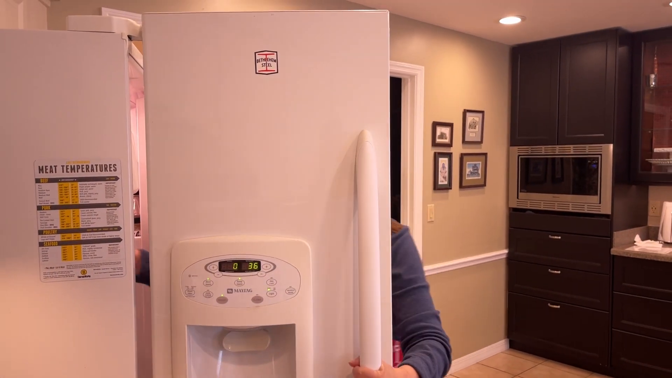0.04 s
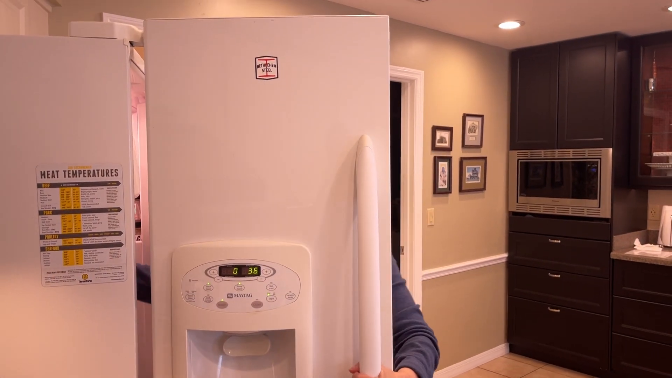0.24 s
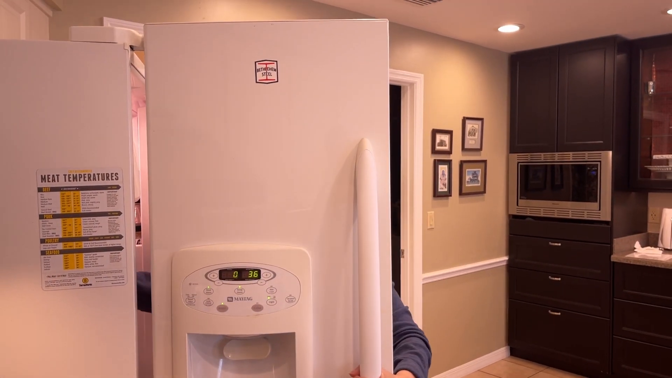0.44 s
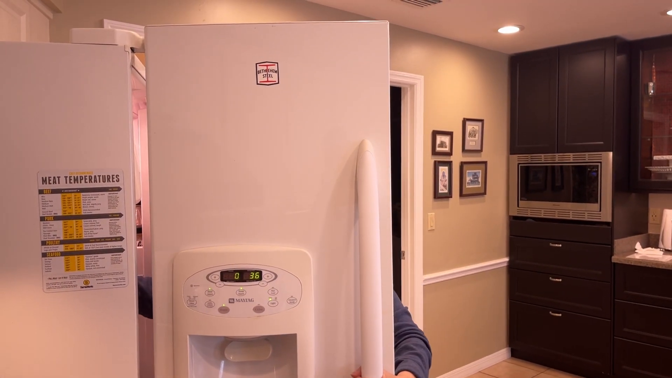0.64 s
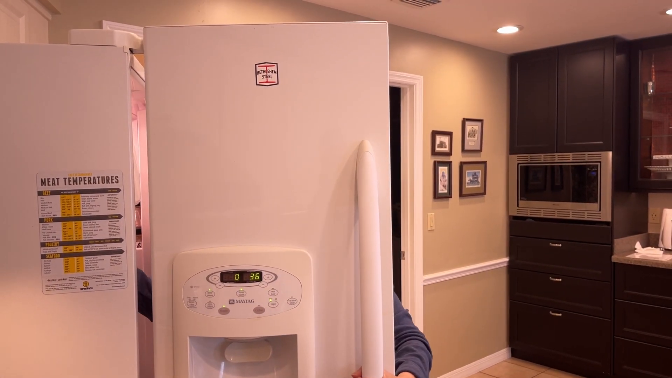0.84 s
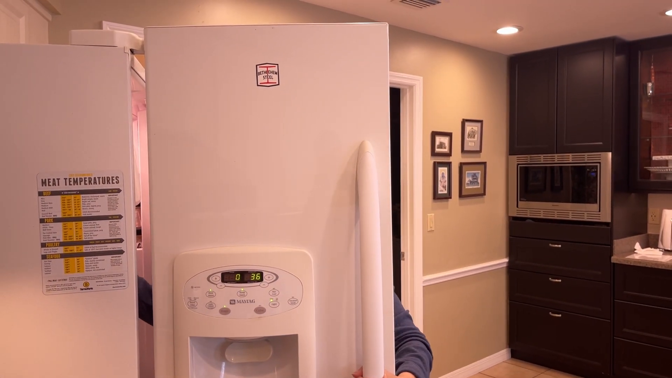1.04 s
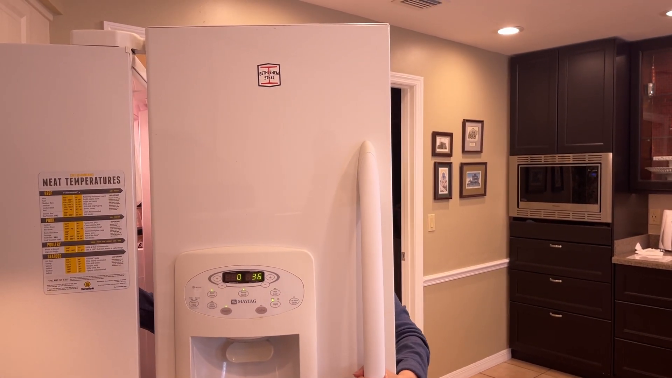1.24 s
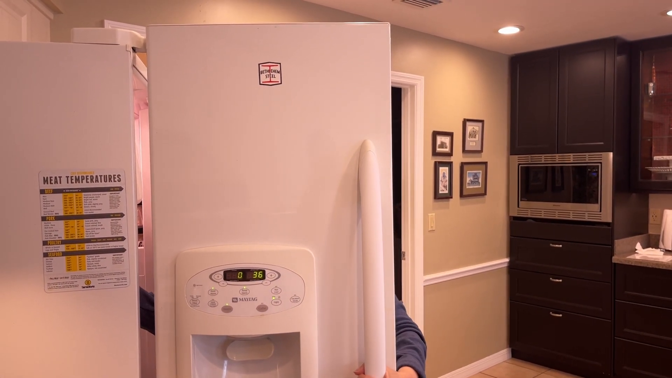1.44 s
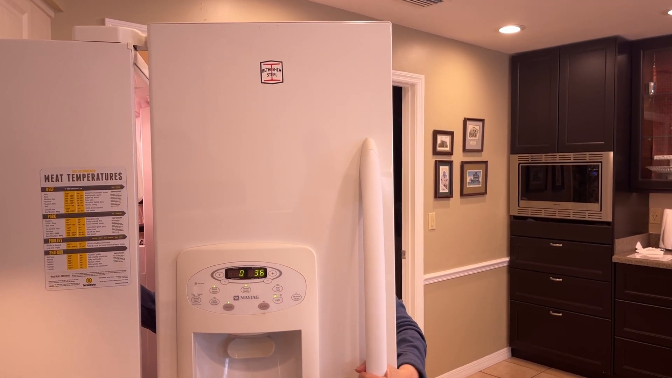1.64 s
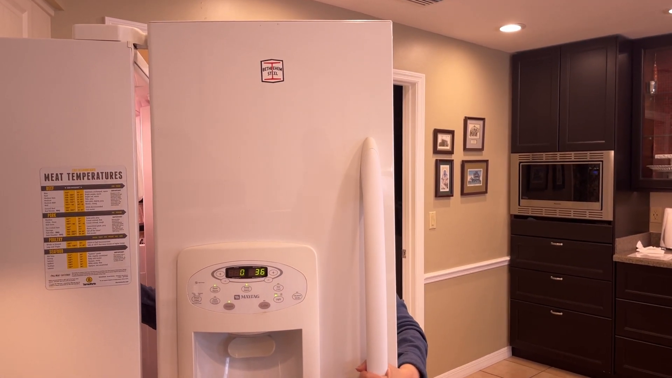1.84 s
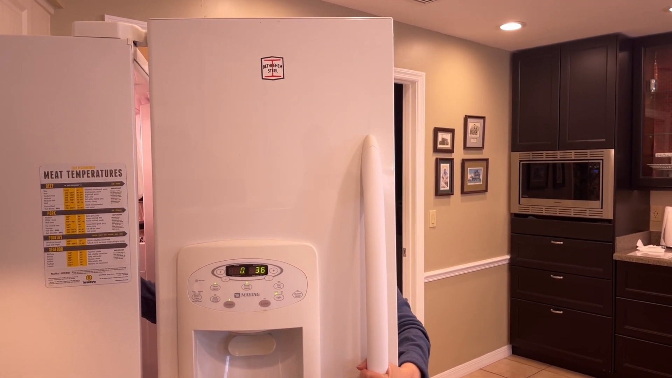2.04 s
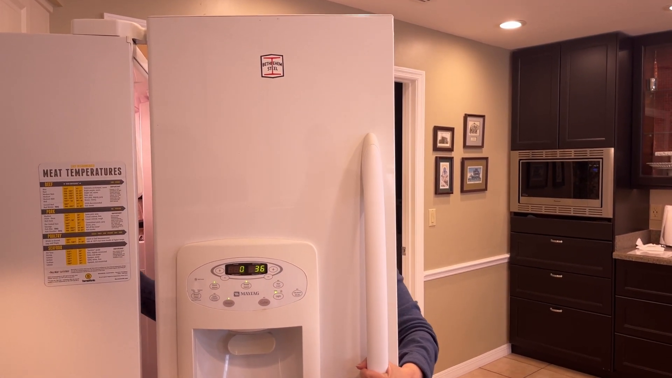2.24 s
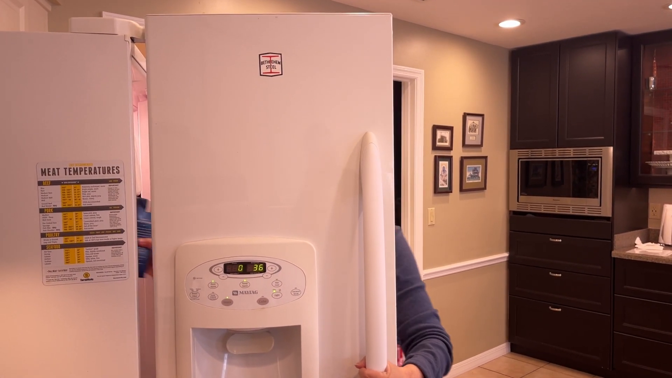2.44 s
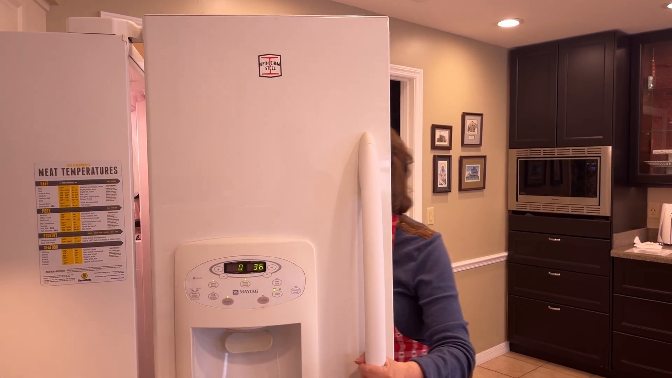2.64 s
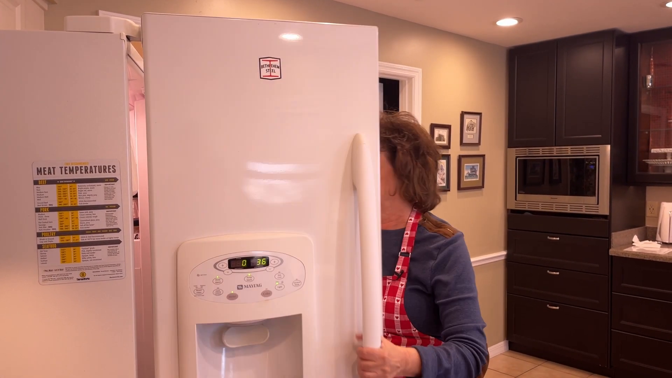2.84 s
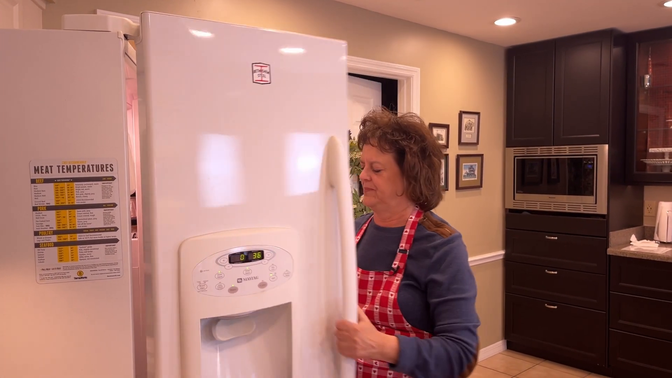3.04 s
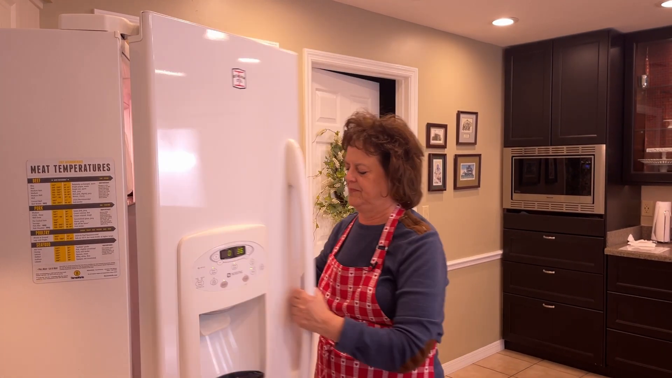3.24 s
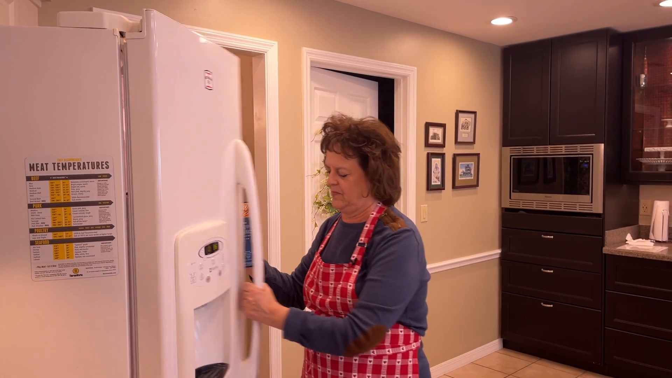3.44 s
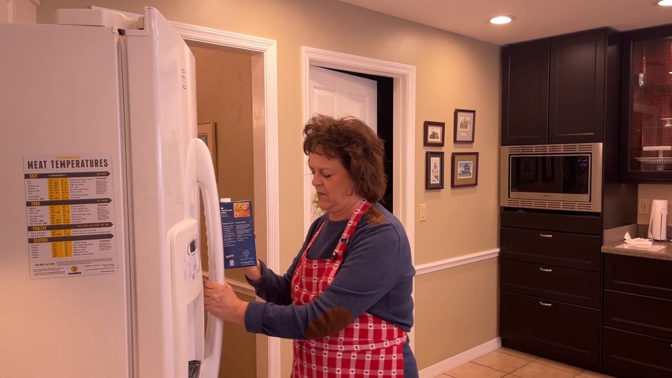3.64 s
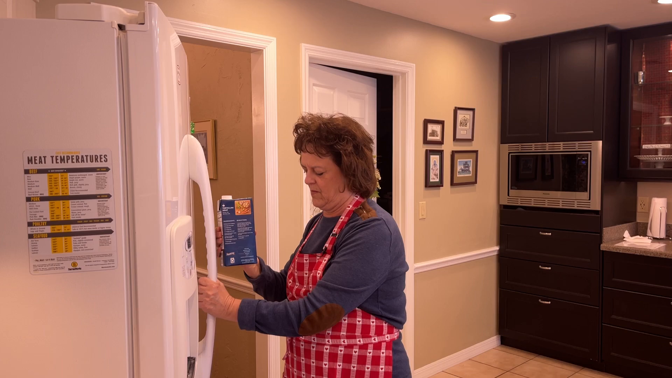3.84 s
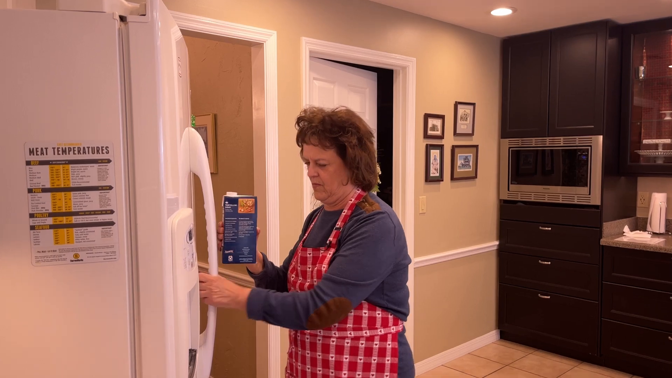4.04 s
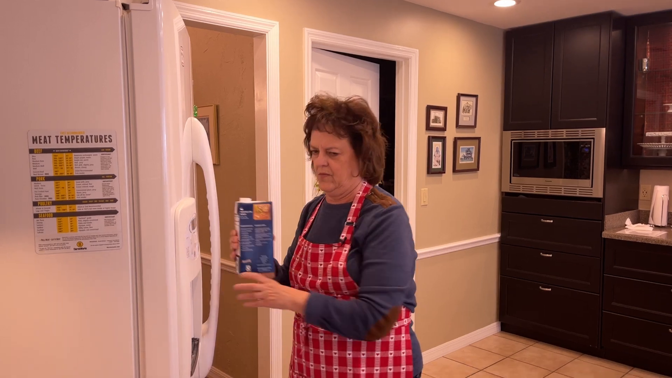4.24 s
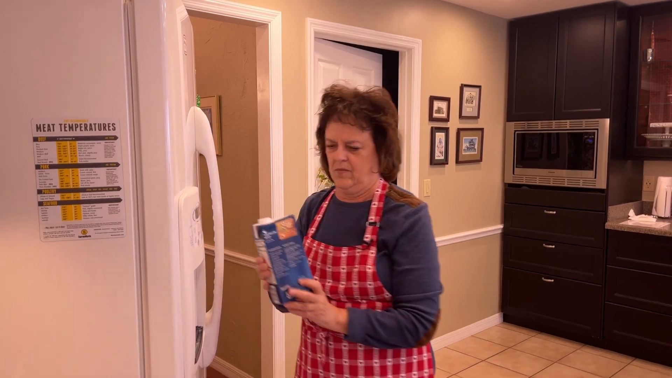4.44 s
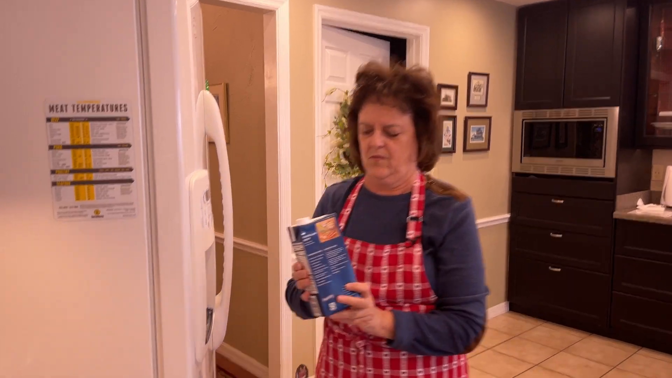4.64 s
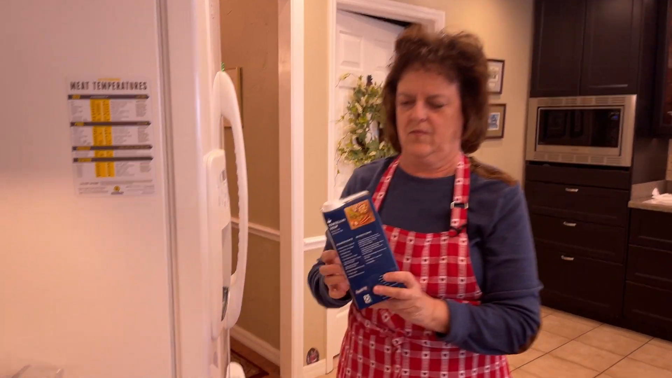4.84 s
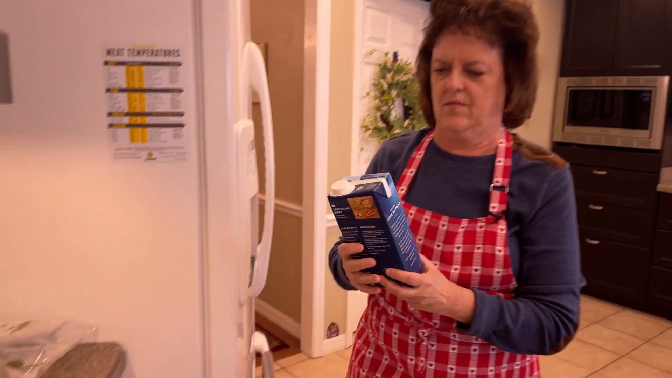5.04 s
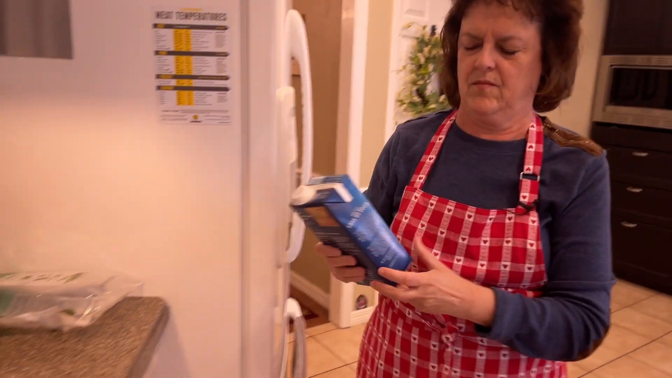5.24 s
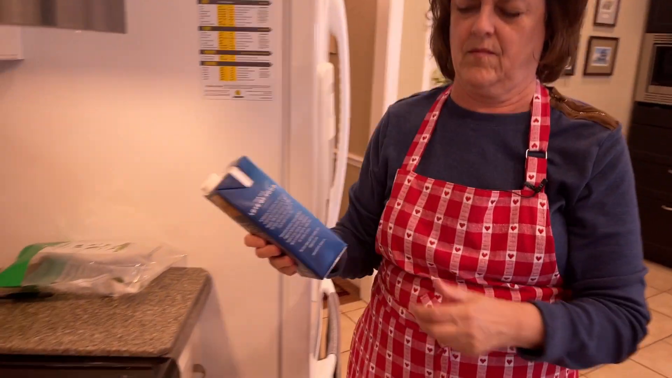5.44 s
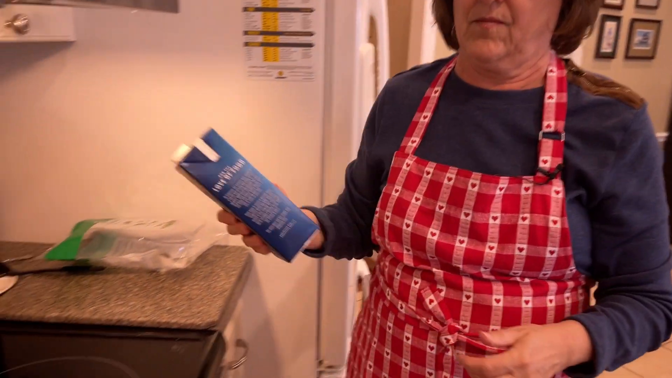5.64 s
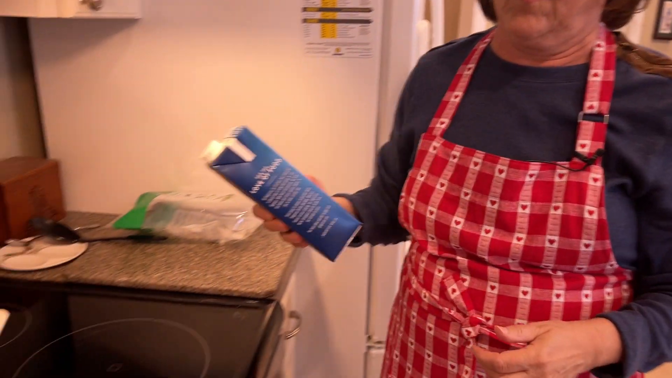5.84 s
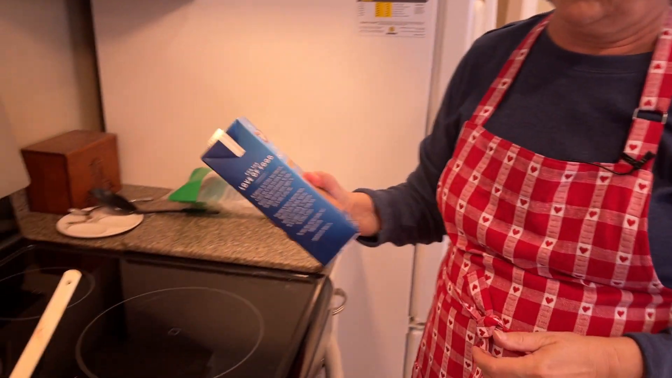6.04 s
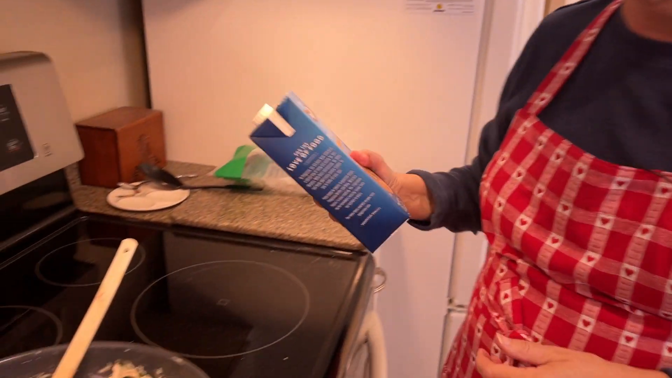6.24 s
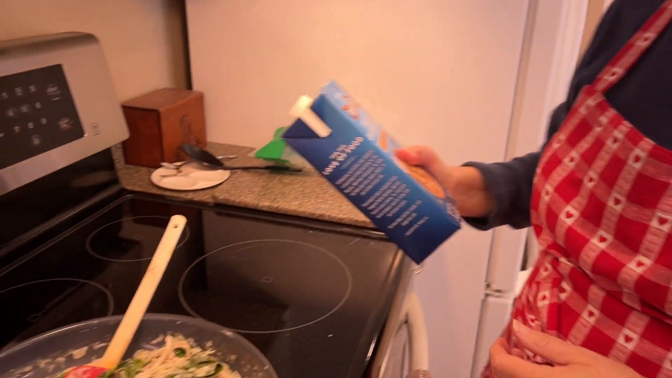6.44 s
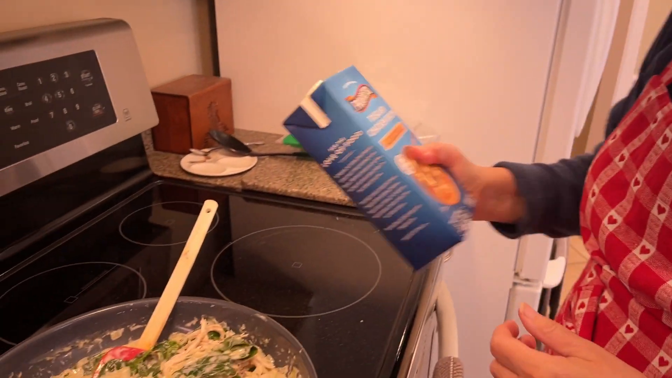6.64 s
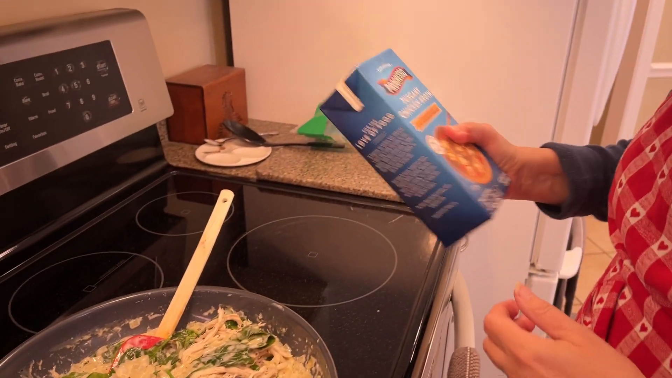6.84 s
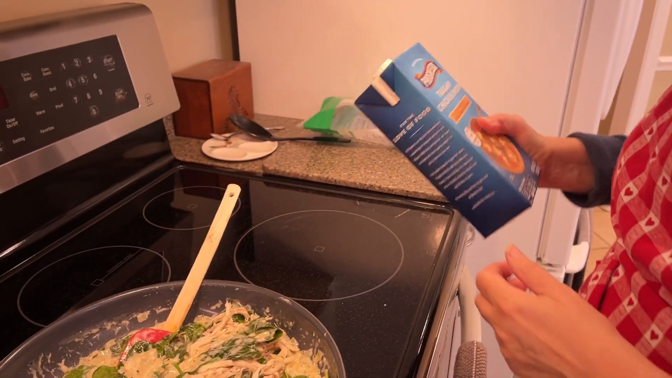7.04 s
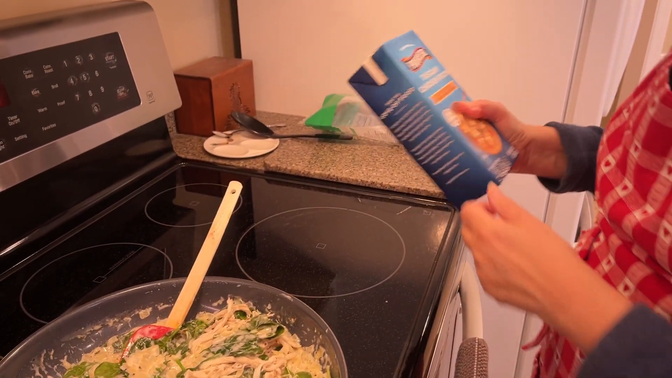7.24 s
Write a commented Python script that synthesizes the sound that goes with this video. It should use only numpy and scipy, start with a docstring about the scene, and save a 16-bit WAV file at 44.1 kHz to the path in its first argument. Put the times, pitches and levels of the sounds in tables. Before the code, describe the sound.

A quiet home kitchen, heard through a microphone worn on clothing, with steady faint hiss and a low refrigerator hum. From about 0.4 to 1.5 seconds, cloth rustles close by while things slide and knock lightly on a fridge shelf, with the clearest taps near 0.7 and 1.0 to 1.4. It then stays nearly quiet, with small fabric ticks around 1.8 to 2.2. Near 3.0 a very thin hinge squeak and soft foot thuds lead to the door shutting at 3.6: a rapid cluster of hard blows and rattling contents, dulling and dying by about 4.0 with a short room tail. From 4.3 to 5.4, sleeve rustle and light carton taps. From 5.5 to the end at about 7.3, the half-full carton is shaken briskly, with uneven splashes, bubbling gurgles and hollow slaps, strongest near 6.06 and 7.1.

```python
"""A home kitchen, heard from a microphone worn on clothing. First, over faint hum and hiss, cloth rustles close by
and things slide and knock on a fridge shelf: noise bursts, and struck bodies ringing in damped modes. The door
shuts with a thin squeak, a burst of rattling blows and a roar that dulls as it dies; feet, door and handled carton
thud as single low swings. Then the half-full carton is shaken: bursts of noise and rising bubble tones slosh,
slaps ring its walls."""
import sys
import numpy as np
from scipy import signal
from scipy.fft import rfft, irfft
from scipy.io import wavfile
from scipy.ndimage import uniform_filter1d

SR = 44100
rng = np.random.default_rng(int(sys.argv[2]) if len(sys.argv) > 2 else 0)


def log_audio(samples):
    """Write samples as a 16-bit WAV file to the path given in sys.argv[1]."""
    # one column per channel
    frames = np.atleast_2d(samples).T
    # limit to full scale, then quantise
    limited = np.clip(frames, -1, 1)
    pcm = np.round(limited * 32767).astype(np.int16)
    wavfile.write(sys.argv[1], SR, pcm)


N = 321930  # length [samples]


def undb(db):
    """Decibels to amplitude."""
    return 10 ** (np.asarray(db) / 20)


def unit(x):
    """Scale to rms 1."""
    return x / np.sqrt(np.mean(x ** 2))


def white():
    """White noise as long as the scene."""
    return rng.standard_normal(N)


def band(x, lo_hz, hi_hz):
    """Band-pass."""
    sos = signal.butter(2, [lo_hz, min(hi_hz, .45 * SR)], "band", fs=SR, output="sos")
    return signal.sosfilt(sos, x)


def colour(x, points):
    """Shape the spectrum of noise by (frequency [Hz], level [dB]) points, joined along log frequency."""
    hz, db = np.transpose(points)
    f = np.arange(len(x) // 2 + 1) * SR / len(x) + 1  # + 1 avoids log 0
    return irfft(rfft(x) * undb(np.interp(np.log(f), np.log(hz), db)), len(x))


def walk(rate):
    """Random levels, `rate` of them a second, with slewed steps; rms 1."""
    k = int(SR / rate)
    held = np.repeat(rng.standard_normal(N // k + 1), k)
    return unit(uniform_filter1d(held, k)[:N])


def grains(rate, scatter_db, tail_s):
    """Envelope of dense random bursts of uneven size, each with a sharp front and decaying tail; rms 1."""
    sizes = undb(scatter_db * np.clip(rng.standard_normal(N), -2, 2))
    clicks = (rng.random(N) < rate / SR) * sizes
    power = signal.lfilter([1], [1, -np.exp(-1 / (tail_s * SR))], clicks ** 2)
    return unit(np.sqrt(power + 1e-9))


def tilted(bursts, tilt, bands, pivot_hz, flicker_db):
    """Bursts in octave bands of unrelated noise, weighted by a slope [dB/octave], each flickering alone."""
    out = 0
    for hz, db in bands:
        noise = unit(band(bursts * white(), hz / np.sqrt(2), hz * np.sqrt(2)))
        level_db = db + tilt * np.log2(hz / pivot_hz) + flicker_db * walk(30)
        out = out + undb(level_db) * noise
    return out


def strokes(rows):
    """Gain of overlapping gestures that swell and fade by 20 dB in their times, and their power-weighted tilt."""
    t, power, tilt = np.arange(N) / SR, np.full(N, 1e-20), np.zeros(N)
    for s, db, swell_s, fade_s, *slope in rows:
        swell_s, fade_s = max(swell_s, .003), max(fade_s, .003)
        near = slice(max(int((s - 3 * swell_s) * SR), 0), int((s + 3 * fade_s) * SR))
        shape_db = 20 * np.minimum((t[near] - s) / swell_s, (s - t[near]) / fade_s)
        own = undb(db + shape_db) ** 2
        power[near] += own
        tilt[near] += own * sum(slope)  # rows without a slope add none
    return np.sqrt(power), tilt / power


def knocks(events, modes, reach_oct, rise_s, crack_s, crack_hz, floor_hz):
    """Each blow rings the modes nearest to where it lands and throws a short crack of treble."""
    out, t = np.zeros(N + SR), np.arange(SR // 4) / SR
    hz, db = np.transpose(modes)[:, :, None]
    chance = rng.standard_normal((len(events), len(modes), 2))
    hiss = unit(band(rng.standard_normal(N + SR), crack_hz, 9000.0))
    low_cut = signal.butter(4, floor_hz, "high", fs=SR, output="sos")  # a small body radiates no bass
    for (s, peak_db, near_hz, t60, crack_db), luck in zip(events, chance):
        distance = np.log2(hz / near_hz) / reach_oct
        share = undb(db + 4.1 * luck[:, :1]) / (1 + distance ** 2) ** 2
        # higher modes die sooner
        fade = np.exp(-np.log(1000) * t / max(t60, .01) * (hz / near_hz) ** 0.075)
        swing = np.sin(2 * np.pi * hz * (1 + 0.052 * luck[:, 1:]) * t)
        ring = (share * fade * swing).sum(0) * (1 - np.exp(-t / rise_s))
        ring = signal.sosfilt(low_cut, ring)
        i = int(s * SR)
        crack = undb(crack_db) * hiss[i:i + len(t)] * np.exp(-t / crack_s)
        out[i:i + len(t)] += undb(peak_db) * (ring / np.abs(ring).max() + crack)
    return out[:N]


# blows of the closing door and its load:
# (time [s], peak of the direct ring [dB], struck near [Hz], t60 there [s], crack rms at onset re that peak [dB])
DOOR_BLOWS = [(3.577, -55, 510, 0.064, -11), (3.619, -24, 810, 0.016, -11.5), (3.627, -27, 980, 0.037, -34),
              (3.639, -35, 1360, 0.017, -8.5), (3.649, -25.5, 690, 0.02, -37),
              (3.673, -23.5, 406, 0.068, -19), (3.68, -17, 636, 0.008, -31),
              (3.699, -30.5, 368, 0.059, -37), (3.7335, -28.5, 1500, 0.02, -16),
              (3.756, -22.5, 674, 0.0166, -17), (3.786, -23.5, 610, 0.035, -17)]
# modes of the door: (frequency [Hz], relative level [dB])
DOOR_MODES = [(250, 6), (365, 3), (520, -24), (600, 4.5), (790, 4.5), (1090, -0.5), (1295, 7), (1850, 13.5),
              (2290, 7)]


def door_blows():
    """The door and its load ring in damped modes, with very short bright cracks."""
    return knocks(DOOR_BLOWS, DOOR_MODES, 0.85, 0.00058, 0.0025, 2800.0, 156.0)


SEAL_TOUCHES_S, LANDS_S, SHUDDER_HOLD_S = 3.577, 3.621, 0.22
SEAL_DB, SHUDDER_DB = -64, -41  # gain from the seal's touch, and at the landing
HOLD_SAG_DB_S, DYING_DB_S = 20, 117  # fall per second, during and after the hold
SHUDDER_TILT_DB_OCT, DULLING_DB_OCT_S, DULLEST_DB_OCT = 3, 16, -2
# octave bands of the rattling parts: (centre [Hz], relative level [dB])
SHUDDER_BANDS = [(55, -52), (110, -13.5), (220, -8), (440, -3.5), (880, -5.5), (1760, -16.5), (3520, -23.5),
                 (7040, -27.5)]


def shudder():
    """Many loose parts rattling at once: a rough roar that sags slowly, then dies away, dulling early on."""
    since = np.arange(N) / SR - LANDS_S
    sag_db = HOLD_SAG_DB_S * np.clip(since, 0, SHUDDER_HOLD_S)
    dying_db = DYING_DB_S * np.maximum(since - SHUDDER_HOLD_S, 0)
    seal = undb(SEAL_DB) * (since > SEAL_TOUCHES_S - LANDS_S)
    gain = np.where(since > 0, undb(SHUDDER_DB - sag_db - dying_db), seal)
    tilt = np.maximum(SHUDDER_TILT_DB_OCT - DULLING_DB_OCT_S * np.maximum(since, 0), DULLEST_DB_OCT)
    return gain * tilted(grains(370, 1.5, 0.0022), tilt, SHUDDER_BANDS, 320, 1)


# jerks of the carton, each loudest 6 ms after its time:
# (time [s], gain of the splash [dB], gain of the sleeve's rustle [dB], fade by 20 dB [s])
SHAKES = [(5.456, -52, -59, 0.11), (5.5254, -47, -52.5, 0.1), (5.605, -50.5, -67, 0.07),
          (5.629, -47, -59, 0.096), (5.6595, -45, -59, 0.3), (5.742, -38, -53, 0.044),
          (5.764, -41, -54, 0.11), (5.7874, -47, -49.5, 0.1), (5.827, -44, -56, 0.082),
          (5.8726, -49, -74, 0.068), (5.911, -42, -54, 0.077), (5.9333, -37, -63, 0.078),
          (5.9623, -38, -56, 0.092), (6.01, -40.5, -49, 0.097), (6.073, -45, -56, 0.11),
          (6.1093, -44.5, -72, 0.1), (6.15, -44.5, -61, 0.092), (6.19, -40.5, -49.5, 0.07),
          (6.2233, -37, -61, 0.12), (6.2462, -38, -54, 0.14), (6.2999, -43.5, -54, 0.2),
          (6.379, -40.5, -48.5, 0.14), (6.4375, -38.5, -69, 0.13), (6.5136, -35.5, -52, 0.096),
          (6.594, -46, -59, 0.16), (6.6242, -41, -47, 0.074), (6.664, -42, -70, 0.051),
          (6.6906, -40.5, -66, 0.076), (6.7186, -42, -60, 0.077), (6.752, -43, -54, 0.065),
          (6.8164, -33.5, -59, 0.088), (6.8289, -37.5, -56, 0.11), (6.913, -38, -49, 0.1),
          (6.957, -47, -49.5, 0.055), (7.0007, -42, -70, 0.14), (7.0249, -45, -75, 0.1),
          (7.0878, -47, -70, 0.033), (7.1103, -31, -53, 0.053), (7.1724, -40.5, -58, 0.082),
          (7.204, -47, -60, 0.19), (7.2434, -45.5, -53, 0.092), (7.266, -45.5, -69, 0.058)]
SHAKE_SWELL_S, SLOSH_TILT_DB_OCT = .012, 2.5
# octave bands of the splashes: (centre [Hz], relative level [dB])
SLOSH_BANDS = [(200, -15), (400, -12), (800, -12), (1600, -16), (3200, -21), (6400, -27.5)]


def slosh():
    """Small splashes and bubbles against the carton walls, coloured by the box, which radiates no bass."""
    jerks = [(s + SHAKE_SWELL_S / 2, db, SHAKE_SWELL_S, fade_s) for s, db, _, fade_s in SHAKES]
    gain, _ = strokes(jerks)
    splashes = tilted(grains(250, 2.74, 0.0095), SLOSH_TILT_DB_OCT, SLOSH_BANDS, 1650, 2.36)
    fizz = undb(-23) * bubbles(5500., 13000., 4., 15., count=260)
    gurgle = undb(-15.0) * bubbles(345.5, 4490.0, 4.1, 14.0, count=500)
    return band(gain * (splashes + gurgle + fizz), 265.0, 15000.)


def bubbles(lo_hz, hi_hz, cycles, scatter_db, count):
    """Trapped air pockets: short rising tones, random in time and pitch; rms 1 from the first shake on."""
    out, t = np.zeros(N + SR), np.arange(SR // 20) / SR
    start, end = SHAKES[0][0], N / SR
    for when, pitch, size in rng.random((count, 3)):
        hz = lo_hz * (hi_hz / lo_hz) ** pitch
        rising = np.sin(2 * np.pi * hz * t * (1 + 0.0664 * hz * t / cycles))
        tone = rising * np.exp(-hz * t / cycles)
        i = int((start + when * (end - start)) * SR)
        out[i:][:len(t)] += undb(scatter_db * size) * tone
    return unit(out[:N]) * np.sqrt((end - start) * SR / N)


# slaps of liquid and fingers on the carton:
# (time [s], peak of the direct ring [dB], struck near [Hz], t60 there [s], crack rms at onset re that peak [dB])
CARTON_SLAPS = [(4.314, -46, 493, 0.024, -31), (4.616, -58, 440, 0.066, -25),
                (4.973, -46.5, 716, 0.029, -15.5), (5.249, -42, 477, 0.023, -6.5),
                (5.366, -54, 734, 0.057, -9), (5.395, -50.5, 670, 0.027, -13), (5.506, -48, 623, 0.04, -18),
                (5.517, -36.5, 620, 0.035, -29), (5.562, -48, 519, 0.051, -22),
                (5.694, -40.5, 477, 0.076, -39), (5.743, -42.5, 1030, 0.091, -28),
                (5.764, -39, 1600, 0.03, -27), (5.869, -45.5, 468, 0.051, -9),
                (5.961, -36, 1290, 0.019, -24), (6.0618, -17, 512, 0.015, -41),
                (6.069, -29, 740, 0.023, -40), (6.249, -44, 900, 0.082, -14),
                (6.314, -40.5, 490, 0.079, -6), (6.354, -41, 576, 0.12, -16),
                (6.516, -39.5, 640, 0.029, -10), (6.592, -40.5, 614, 0.068, -12),
                (6.694, -37, 467, 0.076, -22), (6.723, -41.5, 840, 0.022, -28),
                (6.829, -32.5, 1520, 0.037, -28), (6.918, -40.5, 450, 0.12, -9),
                (7.026, -42.5, 1092, 0.035, -26), (7.112, -26, 574, 0.06, -20.5),
                (7.245, -43, 590, 0.07, -12), (7.269, -42.5, 430, 0.09, -12)]
# modes of the carton walls: (frequency [Hz], relative level [dB])
CARTON_MODES = [(300, 17), (390, -1.5), (475, 4.5), (560, 1), (700, 7), (845, 2.5), (1100, 12.5),
                (1300, 17), (1600, 18.5), (1990, 22), (2390, -19)]


def carton_slaps():
    """The carton walls ring in damped modes when slapped, with a short crack."""
    return knocks(CARTON_SLAPS, CARTON_MODES, 0.66, 0.0016, 0.0039, 1100.0, 340.0)


# knocks on the shelf:
# (time [s], peak of the direct ring [dB], struck near [Hz], t60 there [s], crack rms at onset re that peak [dB])
SHELF_KNOCKS = [(0.495, -49.5, 725, 0.059, -33), (0.665, -48, 574, 0.05, -24), (0.72, -35, 730, 0.05, -30),
                (0.749, -48, 218, 0.17, -34), (0.901, -55, 273, 0.21, -71),
                (1.038, -34.5, 283, 0.072, -22.5), (1.064, -37.5, 213, 0.075, -44),
                (1.107, -48, 264, 0.083, -27), (1.139, -40, 680, 0.026, -17), (1.154, -38, 278, 0.12, -30),
                (1.209, -43, 268, 0.059, -17), (1.391, -39, 1900, 0.017, -29), (1.95, -54, 340, 0.084, -21),
                (2.019, -49.5, 300, 0.082, -33), (2.675, -52.5, 626, 0.082, -14),
                (2.853, -60, 506, 0.037, -13), (3.15, -44.5, 192, 0.051, -39),
                (3.329, -53, 225, 0.042, -33)]
# modes of the shelf: (frequency [Hz], relative level [dB])
SHELF_MODES = [(220, -15.5), (280, -10.5), (340, -15), (520, -1.5), (620, 5.5), (740, 7.5), (1000, 12),
               (1350, 8.5), (1600, 3), (1800, 15), (2100, 12.5), (2900, 4)]


def shelf_knocks():
    """The shelf rings in damped modes, with a longer and fuller crack than the door."""
    return knocks(SHELF_KNOCKS, SHELF_MODES, 0.73, 0.0013, 0.021, 780.0, 122.0)


# slides of things and feet:
# (time of the loudest [s], gain [dB], swell by 20 dB [s], fade by 20 dB [s], brightness [dB/octave])
SLIDES = [(0.47, -61.5, 0.19, 0.26, -3), (0.76, -56.5, 0.28, 0.32, -1.5), (1.1, -62, .1, 0.34, -6),
          (1.27, -54, 0.2, 0.32, -0.5), (1.43, -58.5, 0.9, 0.057, -4), (2.05, -63.5, 0.7, 0.37, -2.5),
          (3.11, -65.5, 0.74, .7, 0), (4.5, -67, 1.5, 1, 0), (5.28, -61, 0.15, 0.35, 0.5)]
# octave bands of the scraping: (centre [Hz], relative level [dB])
SCRAPE_BANDS = [(130, -16), (260, -8.5), (520, -8), (1040, -10), (2080, -15), (4160, -14)]


def scrape():
    """Stick-slip bursts of things and feet being shifted, duller or brighter as the contact changes."""
    gain, tilt = strokes(SLIDES)
    return gain * tilted(grains(200, 3.4, 0.014), tilt, SCRAPE_BANDS, 500, 3.0)


# strokes of cloth on cloth: (time of the loudest [s], gain [dB], swell by 20 dB [s], fade by 20 dB [s])
CLOTH_STROKES = [(0.445, -64, 0.085, .07), (0.73, -62, 0.28, 0.94), (0.88, -71, 0.46, 0.094),
                 (1.044, -68, .02, .1), (1.28, -53.5, 0.2, 0.23), (1.41, -60.5, 0.33, 0.055),
                 (1.762, -60, 0.022, 0.025), (1.93, -69, 0.12, 0.37), (2.184, -63, 0.034, 0.017),
                 (2.68, -75, 0.05, .2), (3.16, -64, 0.35, 0.2), (4.13, -71.5, 1, 0.67),
                 (4.324, -53.5, .025, 0.21), (4.57, -60, 0.063, 0.24), (4.782, -56.5, 0.055, 0.056),
                 (4.91, -57.5, 0.14, 0.066), (5.08, -64, 0.14, 0.26), (5.25, -60, 0.094, 0.044),
                 (5.29, -58, .01, 0.045), (5.37, -67, .01, 0.077)]
# bands of the crackling fibres: (centre [Hz], relative level [dB])
RUSTLE_BANDS = [(3000, -21), (6000, -15), (9500, -10), (13500, -8)]


def rustle():
    """Fibres catching and letting go, close to the microphone: a fine, bright crackle."""
    sleeve = [(s + SHAKE_SWELL_S / 2, db, SHAKE_SWELL_S, fade_s) for s, _, db, fade_s in SHAKES]
    gain, tilt = strokes(list(CLOTH_STROKES) + sleeve)
    return gain * tilted(grains(1500, 5.5, 0.0039), tilt, RUSTLE_BANDS, 6060, 0.26)


# t60 of a thud that peaks at -60 dB, and its log growth per dB: harder thuds ring longer
THUD_T60_S, THUD_LONGER_PER_DB = .08, 0.0047
# low thuds of feet, of the door, and of the carton being handled and slapped:
# (time [s], peak level [dB], pitch [Hz])
THUDS = [(1.036, -50, 136), (1.218, -58, 178), (3.098, -54, 64), (3.157, -57, 69), (3.208, -59, 81.6),
         (3.644, -44.5, 97), (3.713, -47, 159), (3.802, -42, 99), (3.916, -47, 165), (4.376, -55, 70),
         (4.449, -65, 39.7), (4.499, -53.5, 150), (4.528, -61, 59.2), (4.787, -64, 144),
         (5.459, -54.5, 64.6), (5.519, -62, 115), (5.58, -61, 60), (6.829, -66, 202), (7.114, -45, 210),
         (7.25, -60, 204)]


def thuds():
    """Soft low pushes, one damped swing each."""
    out, t = np.zeros(N + SR), np.arange(SR // 2) / SR
    for s, peak_db, hz in THUDS:
        t60 = THUD_T60_S * np.exp(THUD_LONGER_PER_DB * (peak_db + 60))
        fade = np.exp(-np.log(1000) * t / t60)
        swing = np.sin(2 * np.pi * hz * t) * fade * (1 - np.exp(-t / 0.0025))
        out[int(s * SR):][:len(t)] += undb(peak_db) * swing / np.abs(swing).max()
    return out[:N]


# faint squeak of the hinge: (time [s], centre of the wavering pitch [Hz], centre of the wavering level [dB])
SQUEAK = [(2.95, 2650, -98), (2.985, 2750, -81), (3.035, 2800, -80), (3.055, 3350, -80), (3.09, 3400, -82),
          (3.13, 3400, -98)]
# low moan of the hinge: (time [s], gain [dB])
GROAN = [(2.68, -73), (2.75, -74), (2.95, -71), (3.06, -69), (3.12, -95)]


def hinge():
    """A thin, broken whistle, a sine of unsteady pitch, over a low moan of narrow noise."""
    t = np.arange(N) / SR
    s, hz, db = np.transpose(SQUEAK)
    pitch = np.interp(t, s, hz) * (1 + .015 * walk(300))
    broken_db = 3 * walk(50)
    level_db = np.interp(t, s, db, -200, -200) + broken_db
    whistle = undb(level_db) * np.sin(2 * np.pi * np.cumsum(pitch) / SR)
    moan = unit(band(white(), 370.0, 433.0)) + 0.17 * unit(band(white(), 520., 570.))
    return whistle + undb(np.interp(t, *np.transpose(GROAN), -200, -200)) * moan


RUMBLE_DB = -84.5  # steady floor under the swells
# swells of floor and body rumble:
# (time of the loudest [s], level [dB], swell by 20 dB [s], fade by 20 dB [s])
RUMBLES = [(0.8, -79, 0.46, 0.37), (1.16, -66, .25, 0.47), (3.13, -66, .2, 0.39), (3.45, -72, 0.27, 0.45),
           (3.66, -50, 0.092, 0.18), (4.5, -70, 0.61, 0.43), (5.47, -69, 0.077, 0.32)]


def rumble():
    """Low, loose noise under everything, swelling with steps and the door."""
    gain = np.hypot(strokes(RUMBLES)[0], undb(RUMBLE_DB))
    return gain * unit(band(white(), 35., 80.))


KITCHEN_DB, HUM_HZ, HUM_DB = -69.5, 174, -83
# spectrum of the background hiss: (frequency [Hz], relative density [dB])
KITCHEN_SPECTRUM = [(55, -51), (90, -15), (145, -7.5), (170, -5.5), (350, -4), (420, -9.5), (530, -3.5),
                    (580, -9), (950, -12.5), (1230, -21), (2500, -25.5), (6000, -29.5), (12000, -28),
                    (15800, -28.5)]


def kitchen():
    """Nearly steady hiss, with the wavering hum of the fridge motor made from a narrow band of noise."""
    hum = unit(band(white(), HUM_HZ - 4, HUM_HZ + 4))
    drift_db = .6 * walk(5)
    hiss = unit(colour(white(), KITCHEN_SPECTRUM))
    return undb(KITCHEN_DB + drift_db) * hiss + undb(HUM_DB) * hum


# decay of the room by band: (centre [Hz], t60 [s])
ROOM_DECAY = [(120, 0.72), (400, 0.59), (1200, 0.47), (3500, 0.23), (9000, 0.25)]


def room(x):
    """Diffuse tail of tiles and cupboards; each band dies at its own rate."""
    t = np.arange(SR // 2) / SR
    tail = 0
    for hz, t60 in ROOM_DECAY:
        noise = band(rng.standard_normal(len(t)), hz / 1.87, hz * 2.0)
        tail = tail + noise * np.exp(-np.log(1000) * t / t60)
    tail *= np.clip(t / 0.012, 0, 1) / np.sqrt(np.sum(tail ** 2))  # the tail builds up over 12 ms
    return signal.fftconvolve(x, tail)[:N]


SHELF_ROOM_DB, DOOR_ROOM_DB, SHUDDER_ROOM_DB, CARTON_ROOM_DB = -18, -11, -12, -14  # sends to the room


def scene():
    """Blows and rattle reach the room; the other sounds stay dry, cloth being too close to excite it."""
    door = door_blows()
    rattle = shudder()
    carton = carton_slaps()
    shelf = shelf_knocks()
    door_send = undb(DOOR_ROOM_DB) * door + undb(SHUDDER_ROOM_DB) * rattle
    wet = room(door_send + undb(SHELF_ROOM_DB) * shelf + undb(CARTON_ROOM_DB) * carton)
    movement = slosh() + scrape() + rustle() + thuds()
    struck = door + rattle + carton + shelf
    return (struck + wet + movement + hinge() + rumble() + kitchen())[None]


TOP_HZ = 15830


def record(dry):
    """The recorder cuts the top with a steep low-pass."""
    return signal.sosfilt(signal.ellip(10, .2, 60, TOP_HZ, fs=SR, output="sos"), dry)


dry = scene()
out = record(dry)
log_audio(out)
```